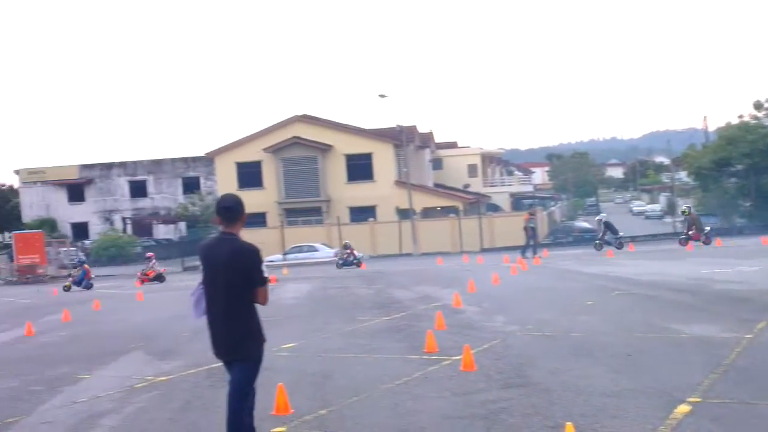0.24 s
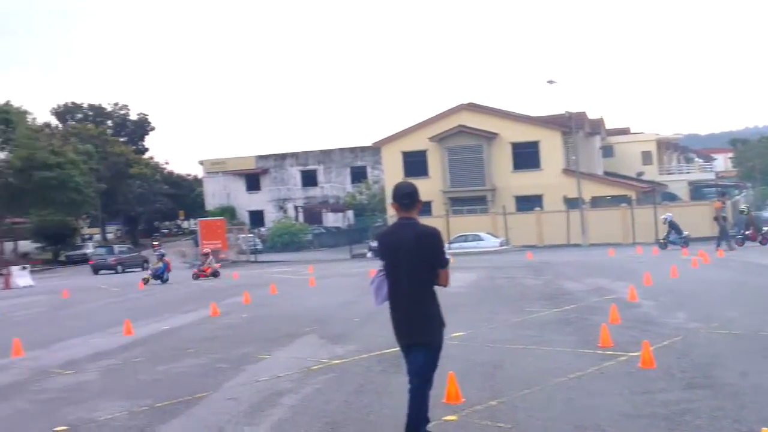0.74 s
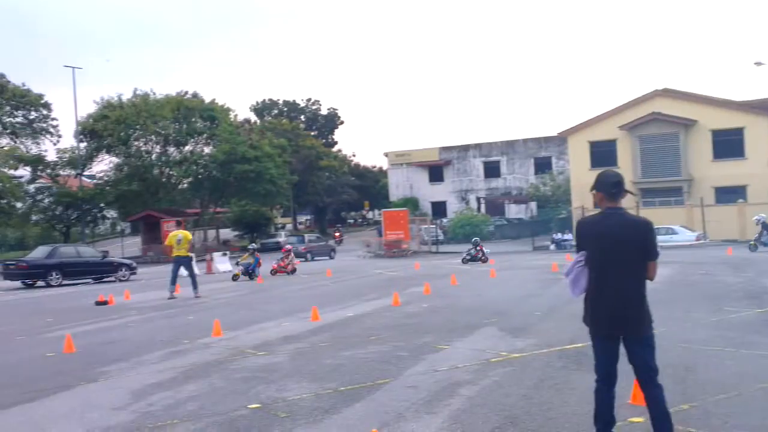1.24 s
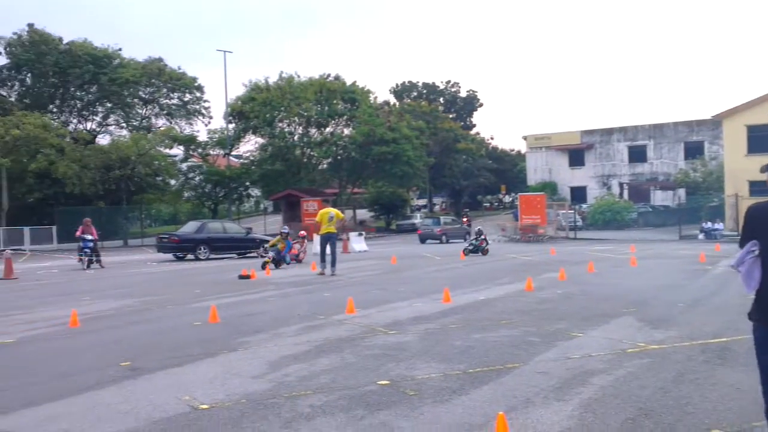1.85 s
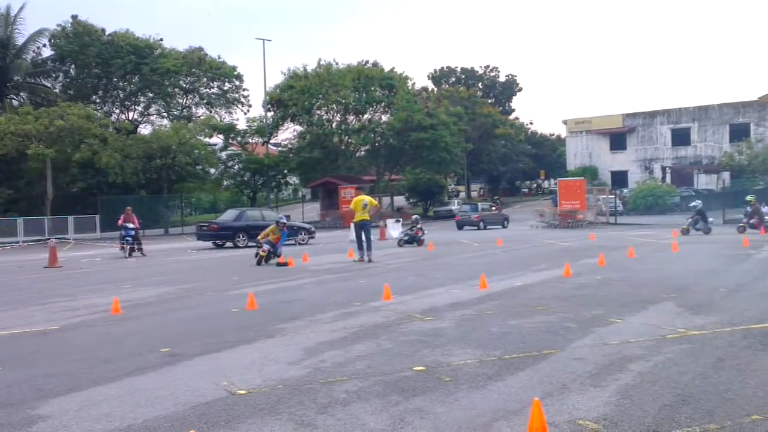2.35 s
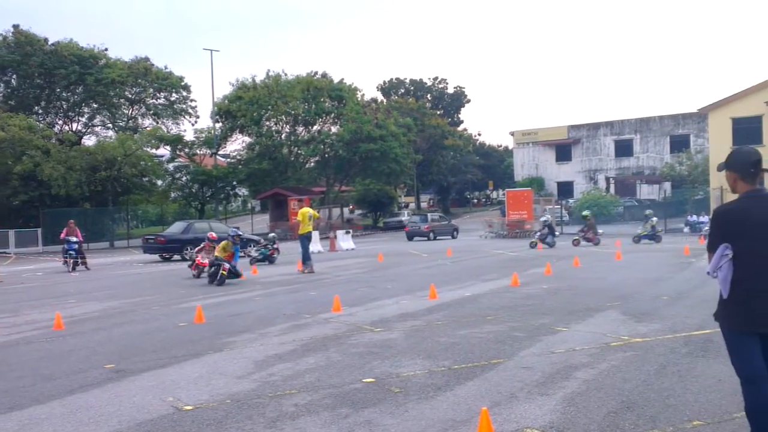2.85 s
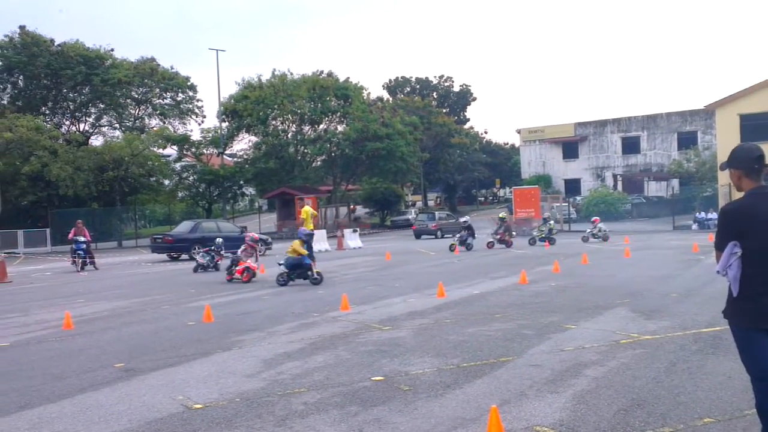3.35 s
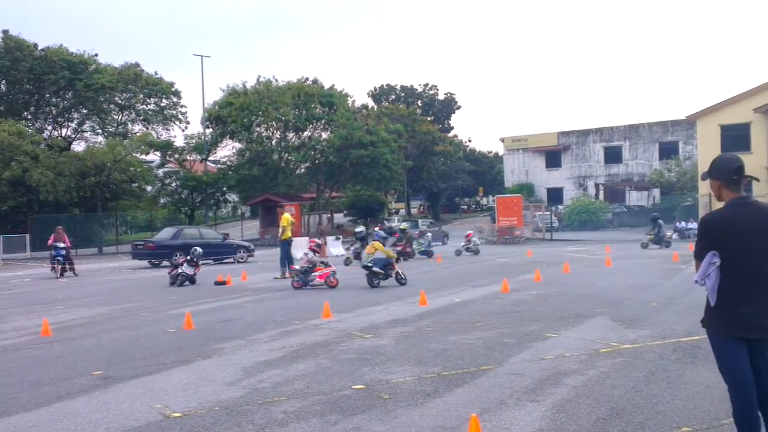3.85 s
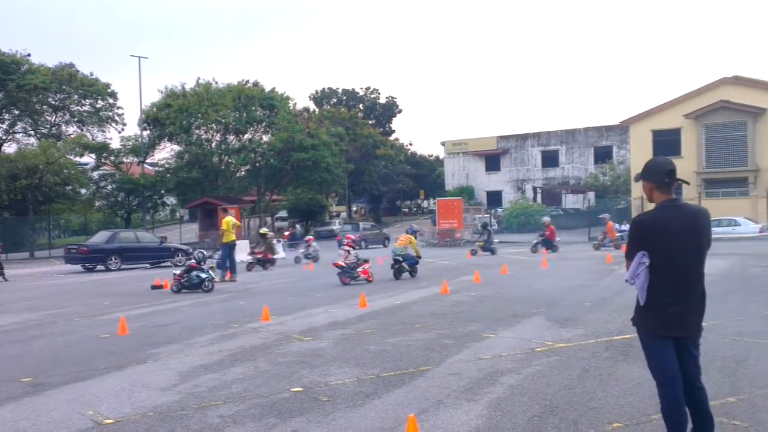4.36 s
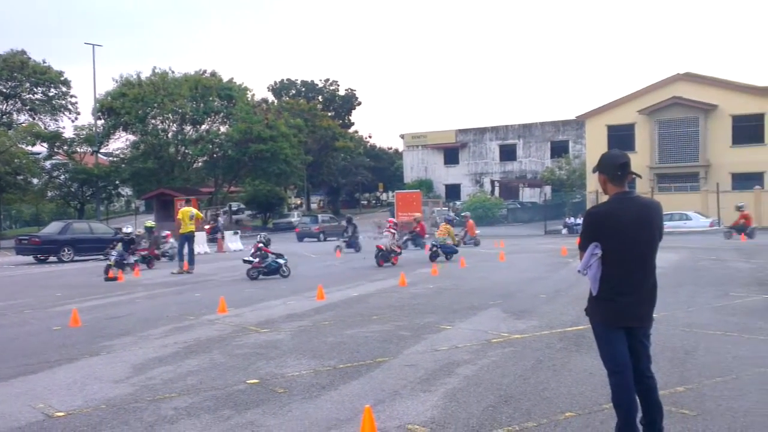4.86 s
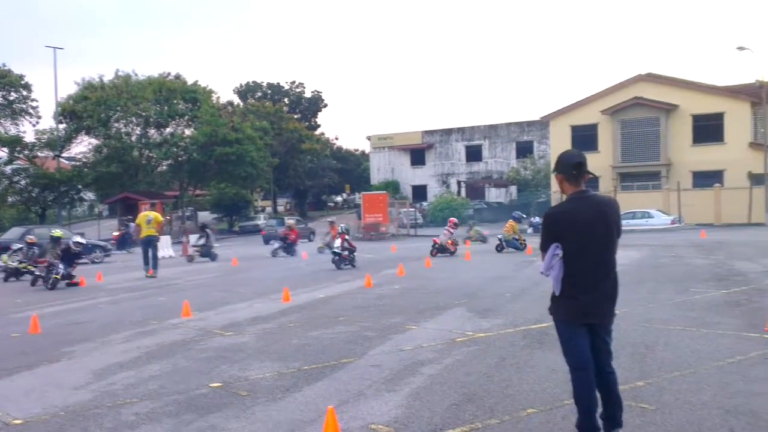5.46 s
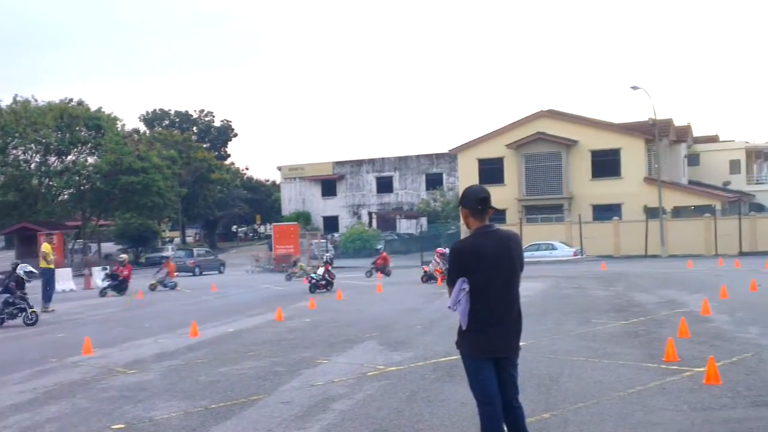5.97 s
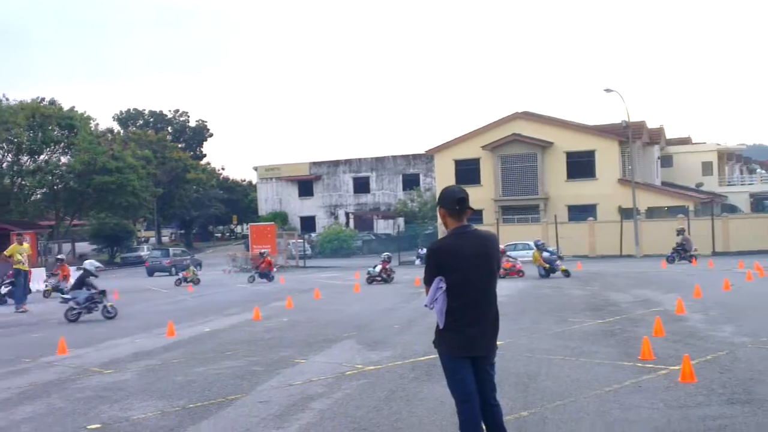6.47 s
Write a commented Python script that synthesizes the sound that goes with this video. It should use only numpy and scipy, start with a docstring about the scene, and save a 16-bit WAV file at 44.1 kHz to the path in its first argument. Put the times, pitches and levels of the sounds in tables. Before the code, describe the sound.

A trackside handheld stereo microphone catches minibikes circling a car park. A low raspy engine and a humming one come first, then steadier and higher ones overlap, fluttering in level. A bright full-throttle whine passes, fading into a thinner, quieter drone. Rapid exhaust pops snap, then a close pack blasts in abruptly, harsh and overloaded, one engine dropping in revs as another climbs. Faint building echoes.

```python
"""Two-stroke minibikes lap a paved yard between buildings, heard from the trackside: bikes stand out in turn,
crackling and popping, over a droning field; a bunch comes on loud near the end and clips.
Each engine is a train of exhaust cracks and gas noise that follows its revs, rung by its pipe and silencer.
Some add intake hum or swelling orders; pops are short bursts; walls echo, and two microphones colour the sum."""
import sys
import numpy as np
from scipy import signal
from scipy.fft import rfft, irfft, next_fast_len
from scipy.io import wavfile
from scipy.ndimage import uniform_filter1d, map_coordinates

SR = 44100
rng = np.random.default_rng(int(sys.argv[2]) if len(sys.argv) > 2 else 0)


def store_wav(level_fs):
    """Save 16-bit WAV to argv[1]."""
    pcm = np.round(np.clip(np.atleast_2d(level_fs), -1, 1) * 32767)
    wavfile.write(sys.argv[1], SR, pcm.T.astype(np.int16))


N = 295470
TIME = np.arange(N) / SR

# exhaust colour of the early and steady bikes: (frequency [Hz], gain [dB])
STEADY_PIPE = [(150, -45), (330, -21), (500, -16.5), (600, -13), (720, -9.5), (920, -7.5), (1450, -7),
               (2000, -8.5), (3300, -4.5), (5200, -12.5), (7500, -2), (10600, -10.5), (11600, -22),
               (15500, -35)]
# intake hum against order frequency, before hum_db; peaks at the air box resonance: (frequency [Hz], level [dB])
INTAKE = [(390, -28), (432, -18.5), (458, -19), (495, -18), (535, -11), (570, -25), (650, -17.5),
          (800, -22)]
# exhaust colour of the bunch, near and surging bikes and pops: (frequency [Hz], gain [dB])
BUNCH_PIPE = [(150, -48.5), (250, -26), (516, -18.5), (681, -2.5), (795, 0), (978, 2), (1120, -3.5),
              (1700, -12.5), (3700, -11), (4630, -11.5), (8320, -10), (9890, -10.5), (15500, -35)]
# silencer resonances of the bunch and near bike: (centre [Hz], half-width [Hz], peak [dB])
BUNCH_RINGS = [(830, 90, 1.5), (2700, 350, 3.8), (3750, 300, 3.5), (8500, 300, 4)]


def gain_of(db):
    """Decibels to amplitude."""
    return 10 ** (np.asarray(db) / 20)


def evened(x):
    """Scales to unit rms."""
    return x / np.sqrt(np.mean(x ** 2) + 1e-20)


def curve(rows):
    """Joins (time, value) points by straight lines."""
    return np.interp(TIME, *np.transpose(rows))


def read(points, hz):
    """Reads a spectrum table on a log-frequency axis."""
    f, value = np.transpose(points)
    return np.interp(np.log(hz + 1), np.log(f + 1), value)


def filtered(x, gain):
    """Applies a gain given as a function of frequency."""
    size = next_fast_len(N + 4096)
    return irfft(rfft(x, size) * gain(np.fft.rfftfreq(size, 1 / SR)), size)[..., :N]


def wander(per_s):
    """Smooth random curve of unit rms that changes about per_s times a second."""
    knots = rng.standard_normal(2048)
    coarse_s = TIME[::64]
    smooth = map_coordinates(knots, [coarse_s * per_s], order=3, mode="wrap")
    return evened(np.interp(TIME, coarse_s, smooth))


def running_rms(x, size=2400):
    """Level of both channels over a few firings."""
    power = uniform_filter1d(np.mean(x ** 2, axis=0), size)
    return np.sqrt(abs(uniform_filter1d(power, size)) + 1e-12)


def presence(rows):
    """Prominence of a source as a gain, fading over 50 ms outside its table."""
    to_edge_s = np.minimum(TIME - rows[0][0], rows[-1][0] - TIME)
    return gain_of(curve(rows)) * np.clip(to_edge_s / 0.05 + 1, 0, 1)


def silencer(cracks, rattle):
    """Chambers hold some bands back and rattle each crack, differently towards each microphone."""
    mean_delay_s, band_spacing_hz = 0.00036, 2314
    t, bins = np.arange(256) / SR, np.fft.rfftfreq(256, 1 / SR)
    delay_s = mean_delay_s * (1 + np.sin(2 * np.pi * bins / band_spacing_hz))
    # phase is the running sum of the group delay
    smear = irfft(np.exp(-2j * np.pi * np.cumsum(delay_s) * bins[1]))
    bounces = rattle * rng.standard_normal((2, len(t))) * np.exp(-t / 0.006)
    bounces = signal.lfilter(*signal.butter(2, 2000, "high", fs=SR), bounces)
    return signal.oaconvolve(cracks[None], smear + bounces, axes=1)[:, :N]


def turbulence(cracks, rasp_hz):
    """Gas noise follows each puff over a steady hiss, above the clean low engine orders."""
    puff_s, rise_s, hiss = 0.0052, 0.00069, 0.35
    puffs = signal.lfilter([1], [1, -np.exp(-1 / (puff_s * SR))], cracks)
    flow = evened(uniform_filter1d(puffs, int(rise_s * SR) + 1))
    noise = (flow + hiss) * rng.standard_normal((2, N))
    return signal.lfilter(*signal.butter(2, rasp_hz, "high", fs=SR), noise)


def firings(hz, rough, rasp_db, stutter=0, rattle=0.15, rasp_hz=1200):
    """Each firing cracks, uneven in time and strength by its roughness (0-1), inside turbulent gas."""
    jitter_s, spread_db = .00007, 11  # at roughness 1
    turns = np.cumsum(hz * (1 + .001 * wander(25))) / SR + rng.random()
    at = np.flatnonzero(np.diff(np.floor(turns)))
    late, strong = rng.standard_normal((2048, 2))[:len(at)].T
    place = at + (np.ceil(turns[at]) - turns[at]) * SR / hz[at] + late * rough * jitter_s * SR
    strength = gain_of(spread_db * rough * np.tanh(strong))
    # stutter weakens every second firing
    strength = strength * (1 - (stutter * np.ones(N))[at] * (np.arange(len(at)) % 2))
    # sinc pulses place the cracks between samples
    near = place.astype(int)[:, None] + np.arange(-6, 8)
    pulses = strength[:, None] * np.sinc(near - place[:, None])
    cracks = np.bincount(np.clip(near, 0, N - 1).ravel(), pulses.ravel(), N)
    return evened(silencer(cracks, rattle)) + gain_of(rasp_db) * turbulence(cracks, rasp_hz)


def exhaust(x, pipe, rings):
    """Causal (minimum-phase) ring of pipe and silencer: broad colour plus narrow resonances."""
    hz = abs(np.fft.fftfreq(4096, 1 / SR))
    db = read(pipe, hz) + sum(peak / (1 + ((hz - f) / width) ** 2) for f, width, peak in rings)
    log_gain = np.log(gain_of(np.maximum(db, -90)))
    ring = np.fft.ifft(np.exp(np.conj(signal.hilbert(log_gain)))).real
    return signal.oaconvolve(x, ring[None, :len(ring) // 2], axes=1)[:, :N]


def ground(x):
    """Late bounces off asphalt and nearby riders; their drifting combs make partials fade and swap."""
    def delayed(lag_s):
        return np.array([np.interp(TIME - lag_s, TIME, side) for side in x])
    asphalt = 0.062 * delayed(0.000317 * np.exp(.12 * wander(1.2)))
    riders = .38 * delayed(.0028 + .0003 * wander(2.5))
    return x + asphalt + riders


def partial(x, angle):
    """Narrow band of x around one gliding engine order, shifted to 0 Hz, smoothed and shifted back."""
    width_hz = 25
    turn, r = np.exp(1j * angle), np.exp(-np.pi * width_hz * 2 / SR)
    return 2 * (turn * signal.filtfilt([1 - r], [1, -r], x / turn)).real


def intake_hum(hz, angle, intake):
    """Clean engine orders 4-7, weighted by the air box resonance."""
    hum_db = -7.5
    order = np.arange(4, 8)[:, None]
    hum = np.sqrt(2) * np.sin(order * angle)
    return np.sum(gain_of(read(intake, order * hz) + hum_db) * hum, axis=0) * gain_of(wander(12))


def flutter():
    """Each source's level flutters fast and at random, as in turbulent air."""
    return gain_of(1.3 * wander(30))


def bike(revs, prominence, pipe, rings, level_db, rough, rasp_db, rattle=0.14, stutter=0, intake=None, whine=()):
    """One engine follows its revs through its exhaust, with any hum or whine; returns sound and share."""
    flywheel_s = 0.05  # rounds off changes of revs
    hz = uniform_filter1d(curve(revs), int(flywheel_s * SR))
    angle = 2 * np.pi * np.cumsum(hz) / SR
    sound = ground(exhaust(firings(hz, rough, rasp_db, stutter, rattle), pipe, rings))
    for order, boost in whine:
        sound = sound + (gain_of(curve(boost)) - 1) * partial(sound, order * angle)
    sound = evened(sound)
    if intake is not None:
        sound = sound + intake_hum(hz, angle, intake)
    share = gain_of(level_db) * presence(prominence)
    return sound * flutter() * share, share


def slow_bike():
    """Low revs with strong gas noise."""
    # revs: (time [s], firing rate [1/s])
    revs = [(0, 95.5), (0.8, 95), (1.45, 92), (2.75, 94.3), (3.05, 96.5), (3.3, 101), (3.55, 100)]
    # prominence before level_db: (time [s], level [dB])
    prominence = [(0, 3.5), (0.8, -5), (1.1, -4.5), (2.8, -8), (3.1, -9), (3.5, -9.5)]
    # exhaust colour: (frequency [Hz], gain [dB])
    pipe = [(88, -75), (150, -27), (462, -14), (519, -17.5), (796, -3), (966, 5), (2550, -19), (3410, -9),
            (4560, -13), (6230, -12.5), (8170, -55), (9730, -29.5), (15500, -56)]
    # silencer resonances: (centre [Hz], half-width [Hz], peak [dB])
    rings = [(873, 59, 4)]
    return bike(revs, prominence, pipe, rings, level_db=1.0, rough=0.52, rasp_db=9.5)


def early_bike():
    """Fairly even firing with intake hum."""
    # revs: (time [s], firing rate [1/s])
    revs = [(0, 99.5), (0.15, 101.5), (0.4, 102), (0.5, 107.2), (0.87, 110.2), (1.07, 108.6), (1.25, 98)]
    # prominence before level_db: (time [s], level [dB])
    prominence = [(0, 1.5), (0.5, -2), (1.05, 0.5), (1.25, -21)]
    # silencer resonances: (centre [Hz], half-width [Hz], peak [dB])
    rings = [(1040, 47, 1), (3580, 120, 4), (4600, 290, 3), (6460, 420, 8), (7800, 630, -7),
             (9750, 1300, 8)]
    return bike(revs, prominence, STEADY_PIPE, rings, level_db=-3.0, rough=0.38, rasp_db=-4, intake=INTAKE)


def steady_bike():
    """The early bike's pipe and hum, with other resonances and revs."""
    # revs: (time [s], firing rate [1/s])
    revs = [(1.38, 92.5), (1.62, 104), (1.76, 105), (1.93, 110.5), (2.15, 112.7), (2.5, 114.7),
            (2.85, 115.2), (3.5, 112.8)]
    # prominence before level_db: (time [s], level [dB])
    prominence = [(1.42, -15), (1.7, -5), (2.4, 1), (3.1, -4.5), (3.56, -6.5)]
    # silencer resonances: (centre [Hz], half-width [Hz], peak [dB])
    rings = [(3670, 250, 3)]
    return bike(revs, prominence, STEADY_PIPE, rings, level_db=2.5, rough=0.38, rasp_db=-4, intake=INTAKE)


def chaser():
    """High revs, little gas noise; one order swells and fades as it rounds the bend."""
    # revs: (time [s], firing rate [1/s])
    revs = [(0.6, 125), (0.72, 132), (0.9, 134.6), (0.98, 129.3), (1.35, 128.2), (1.65, 122.5), (1.95, 124),
            (2.08, 131.5), (2.25, 129.3), (2.55, 129.4), (2.67, 130.6), (2.8, 125), (2.95, 123.5)]
    # prominence before level_db: (time [s], level [dB])
    prominence = [(0.6, -6), (0.75, -4), (1.4, -5.5), (1.7, -7), (1.95, -4.5), (2.2, -6), (2.35, 1.5),
                  (2.65, 3), (2.8, -3.5), (2.96, -8)]
    # exhaust colour: (frequency [Hz], gain [dB])
    pipe = [(150, -44), (450, -24), (650, -6), (830, -3.5), (1250, 1.5), (2100, -9.5), (3400, -6),
            (5100, -3.5), (6500, -4), (10600, -3), (11600, -21.5), (15500, -28)]
    # silencer resonances: (centre [Hz], half-width [Hz], peak [dB])
    rings = [(1431, 110, 6), (1685, 45, 9), (1940, 45, 3), (2345, 40, 9)]
    # swelling order: (engine order, [(time [s], boost [dB])])
    whine = [(11, [(1.0, 0), (1.4, 4), (1.9, 0), (2.1, 5), (2.35, 10), (2.65, 9), (2.8, 2)])]
    return bike(revs, prominence, pipe, rings, level_db=1.2, rough=0.42, rasp_db=-9.0, rattle=0.07, whine=whine)


def leader():
    """Full throttle fires evenly; three orders swell and fade as it rounds the bend."""
    # revs: (time [s], firing rate [1/s])
    revs = [(3.48, 116), (3.56, 122.6), (3.62, 131), (3.69, 135.9), (3.8, 137.6), (3.92, 140.1),
            (4.0, 140.7), (4.12, 138), (4.21, 138.5), (4.3, 134.8), (4.36, 131), (4.42, 120)]
    # prominence before level_db: (time [s], level [dB])
    prominence = [(3.48, -2.5), (3.6, 3.5), (3.7, -2), (4.2, 7), (4.34, 0), (4.42, -16)]
    # exhaust colour: (frequency [Hz], gain [dB])
    pipe = [(150, -50), (550, -21), (700, -4.5), (1100, 0), (1500, -3.5), (2000, -15), (2500, -7),
            (3200, -35), (3900, -6.5), (5100, -9.5), (6200, -14), (7500, -14.5), (10300, -18.5),
            (15500, -39)]
    # silencer resonances: (centre [Hz], half-width [Hz], peak [dB])
    rings = [(825, 40, -2), (1100, 45, -3), (1255, 50, 5), (1810, 50, 11), (2380, 55, 9), (2650, 45, 10),
             (3910, 100, 11), (4620, 90, 7), (5020, 90, 8), (5750, 120, 6)]
    # swelling orders: (engine order, [(time [s], boost [dB])])
    whine = [(8, [(3.58, 0), (3.67, 13), (3.8, 14), (3.9, -3), (4.18, 0), (4.3, 13)]), (9, [(3.55, 5),
             (3.8, 1), (3.88, 12), (4.1, 11), (4.3, 8)]), (6, [(3.6, 2), (3.75, -2), (3.97, -4), (4.07, 7),
             (4.32, 5)])]
    return bike(revs, prominence, pipe, rings, level_db=-3.5, rough=0.15, rasp_db=-14, rattle=0.045, whine=whine)


def coaster():
    """Low, nearly constant revs with little rattle."""
    # revs: (time [s], firing rate [1/s])
    revs = [(4.1, 95), (4.22, 97.7), (4.5, 96.8), (4.72, 95.8)]
    # prominence before level_db: (time [s], level [dB])
    prominence = [(4.1, -10), (4.25, -2), (4.4, -6), (4.68, 2.5), (4.78, -27)]
    # exhaust colour: (frequency [Hz], gain [dB])
    pipe = [(150, -44), (480, -16), (750, 7), (1450, 7), (1800, 0), (3900, 0.5), (5200, -1), (7500, 1),
            (10500, -8.5), (15500, -29)]
    # silencer resonances: (centre [Hz], half-width [Hz], peak [dB])
    rings = [(666, 29, 6), (760, 70, 1), (1470, 36, 3), (3950, 330, 9.5), (5000, 600, 4)]
    return bike(revs, prominence, pipe, rings, level_db=-2.0, rough=0.24, rasp_db=-9, rattle=0.055)


def late_bike():
    """Off the throttle every second firing is weak, less so as the revs pick up."""
    # revs: (time [s], firing rate [1/s])
    revs = [(4.7, 93), (4.83, 97.3), (4.89, 101.7), (5.0, 105.1), (5.17, 107.3), (5.4, 106.6),
            (5.46, 101.5), (5.85, 99.5)]
    # prominence before level_db: (time [s], level [dB])
    prominence = [(4.65, -1), (4.8, -6.5), (4.95, -2), (5.38, -4), (5.46, -15.5), (5.85, -8)]
    # exhaust colour: (frequency [Hz], gain [dB])
    pipe = [(100, -66), (200, -32), (500, -22), (650, -1.5), (900, 2), (1500, -1.5), (1800, 1.5),
            (2600, -4.5), (4000, -4.5), (5800, -15), (7700, -2.5), (10500, -16), (15500, -30)]
    # silencer resonances: (centre [Hz], half-width [Hz], peak [dB])
    rings = [(855, 16, 8), (950, 25, 9.5), (1380, 66, 8), (1584, 26, 8), (1770, 110, -19)]
    # loss of every second firing: (time [s], depth [0-1])
    stutter = [(4.82, 0.9), (4.88, 0.37)]
    return bike(revs, prominence, pipe, rings, level_db=-1.4, rough=0.24, rasp_db=-5.0, rattle=0.045,
                stutter=curve(stutter))


def near_bike():
    """Rough firing whose revs rise, then drop sharply."""
    # revs: (time [s], firing rate [1/s])
    revs = [(5.42, 100.9), (5.85, 102.3), (6.15, 112.3), (6.25, 79.76), (6.4, 69.42), (6.7, 73.66)]
    # prominence before level_db: (time [s], level [dB])
    prominence = [(5.46, -8), (5.62, -7.5), (6.1, -3), (6.27, 5), (6.42, -1), (6.55, 1), (6.7, -8)]
    return bike(revs, prominence, BUNCH_PIPE, BUNCH_RINGS, level_db=2.0, rough=0.6, rasp_db=-5.0)


def surging_bike():
    """Rough firing with climbing revs."""
    # revs: (time [s], firing rate [1/s])
    revs = [(5.6, 111.7), (5.85, 117.8), (6.0, 121), (6.12, 126), (6.3, 127.6), (6.5, 129.7), (6.7, 134.1)]
    # prominence before level_db: (time [s], level [dB])
    prominence = [(5.6, -13), (5.95, -7), (6.1, -1.5), (6.25, -1), (6.4, 1), (6.7, -8)]
    # silencer resonances: (centre [Hz], half-width [Hz], peak [dB])
    rings = [(910, 67, 5.3), (1232, 27, 13), (1433, 125, 18.3)]
    return bike(revs, prominence, BUNCH_PIPE, rings, level_db=-2.5, rough=0.69, rasp_db=-4.5)


def pops():
    """Unburnt fuel catches in the pipe, at even gaps within a run: each a hard crack and short roar."""
    # runs of pops: (first [s], last [s], count, level [dB], ring [Hz])
    runs = [(.378, .378, 1, -2, 6500), (.478, .478, 1, 0, 6800), (.568, .568, 1, 4, 6200),
            (2.315, 2.315, 1, -1, 7500), (2.37, 2.377, 2, 0, 2000), (2.47, 2.47, 1, -2, 6200),
            (3.057, 3.057, 1, 3, 2000), (4.527, 4.527, 1, -2, 4500), (4.571, 4.571, 1, 2.5, 6460),
            (4.614, 4.614, 1, 1, 4000), (4.725, 4.768, 3, 1, 7600), (4.79, 4.832, 2, 5, 7800),
            (4.912, 4.912, 1, 9.5, 7600), (5.441, 5.441, 1, 0, 3700), (6.188, 6.188, 1, 6, 1000),
            (6.274, 6.274, 1, 10, 1000), (6.299, 6.323, 2, 7, 1000), (6.368, 6.395, 2, 12.5, 5460),
            (6.424, 6.424, 1, 5, 5440), (6.536, 6.565, 3, 4, 2500)]
    width_hz, ring_db, decay_s, crack = 540, 11.5, 0.0011, 2.5
    t, out = np.arange(1024) / SR, np.zeros((2, N))
    for first, last, count, db, ring_hz in runs:
        for s in np.linspace(first, last, max(round(count), 1)):
            burst = rng.standard_normal((2, len(t))) * np.exp(-t / decay_s)
            burst[:, 0] = crack
            pop = exhaust(burst + 0.31 * burst[::-1], BUNCH_PIPE, [(ring_hz, width_hz, ring_db)])
            out[:, round(s * SR):][:, :pop.shape[1]] += gain_of(db) * pop
    return out


def group(prominence, pipe, rings, rates_hz, swing, rough, rasp_db, echo_db):
    """Engines whose revs drift apart, blurred by the walls; returns sound and share."""
    drive = np.zeros((2, N))
    for hz in rates_hz:
        engine = firings(hz * np.exp(swing * wander(1.6)), rough, rasp_db, rasp_hz=238)
        drive += engine * gain_of(2 * wander(5.3))
    share = presence(prominence)
    return evened(yard(exhaust(drive, pipe, rings), echo_db, t60=1.0)) * share * flutter(), share


def bunch():
    """Two rough engines in the bunch that comes out of the bend."""
    # prominence: (time [s], level [dB])
    prominence = [(5.38, 3), (5.47, -3.5), (6.15, 2), (6.34, -2), (6.5, -0.5), (6.7, -11)]
    return group(prominence, BUNCH_PIPE, BUNCH_RINGS, np.linspace(86.6, 120.2, 2), swing=.05,
                 rough=0.66, rasp_db=-4.0, echo_db=-1)


def far_field():
    """Three distant engines drone throughout."""
    # prominence: (time [s], level [dB])
    prominence = [(0, -5), (1.35, -5), (2.0, -3), (2.6, -1.5), (3.5, -6), (3.68, -5), (4.0, -4.5),
                  (4.8, -5), (5.2, -7.5), (6.7, -3.5)]
    # exhaust colour: (frequency [Hz], gain [dB])
    pipe = [(150, -51), (300, -21.5), (520, -13), (720, 2.5), (1000, 1), (1400, -2.5), (2000, -6.5),
            (3400, -2), (5200, -10), (7100, -8), (10000, -18), (11500, -20), (15500, -47)]
    return group(prominence, pipe, [], np.linspace(91.43, 125.48, 3), swing=.06,
                 rough=0.55, rasp_db=-6.5, echo_db=-3)


def yard(x, echo_db, t60):
    """Scattered echoes from walls, cars and trees."""
    delay_s = rng.uniform(.004, .45, (2, 260))
    strength = rng.standard_normal(delay_s.shape) * gain_of(-60 * delay_s / t60)
    taps = np.zeros((2, SR // 2))
    np.put_along_axis(taps, (delay_s * SR).astype(int), strength, 1)
    taps /= np.linalg.norm(taps, axis=1, keepdims=True)
    return x + gain_of(echo_db) * signal.fftconvolve(x, taps, axes=1)[:, :N]


def ports(x):
    """Two close microphones hear low notes alike; each port adds its own colour and delay."""
    # gain on the microphones' difference: (frequency [Hz], gain [dB])
    width = [(200, -32), (600, -12), (1200, -1.5), (3000, -6), (10000, 2.5)]
    # left over right level: (frequency [Hz], level [dB])
    tilt = [(60, 9), (120, -4), (240, -8), (480, 4.5), (950, -1.5), (1890, 2), (3770, -6), (7520, -7.5),
            (15000, 8)]
    # left lead over right: (frequency [Hz], phase [rad])
    phase = [(500, -0.76), (1200, 0.84), (3000, -1.44), (5500, 1), (9000, -1.63), (14000, 1)]
    mid = (x[0] + x[1]) / 2
    side = filtered((x[0] - x[1]) / 2, lambda hz: gain_of(read(width, hz)))
    half = np.array([[.5], [-.5]])
    return filtered(np.array([mid + side, mid - side]),
                    lambda hz: gain_of(half * read(tilt, hz)) * np.exp(1j * half * read(phase, hz)))


def turned(field):
    """Pipes turn to and from the listener: treble and body are levelled and remixed."""
    # treble relative to the whole: (time [s], level [dB])
    facing = [(0, -2), (1.3, -2.5), (2.3, -5), (2.7, -3.5), (3.2, -3), (3.6, -5), (4.1, -4.5), (4.8, -3.5),
              (5.2, -3.5), (5.5, -7), (5.85, -6), (6.1, -7), (6.4, -5.5), (6.7, -5)]
    treble = filtered(field, lambda hz: 1 / (1 + (4700 / (hz + 1)) ** 6))
    body = field - treble
    treble_share = np.clip(gain_of(curve(facing)), 0, .9)
    body_share = np.sqrt(1 - treble_share ** 2)
    return treble_share * treble / running_rms(treble) + body_share * body / running_rms(body)


def scene():
    """Bikes and groups share one overall level and bearing; pops are added on top."""
    # all engines together, before level_trim_db: (time [s], level [dB])
    loudness = [(0.04, -21), (0.55, -17), (0.66, -18.5), (0.7, -22), (0.76, -18), (1.11, -18),
                (1.22, -22.5), (1.35, -26), (1.46, -19.5), (1.62, -21), (1.69, -15), (1.85, -18.5),
                (2.22, -13.5), (2.27, -19.5), (2.38, -17), (2.72, -21.5), (2.82, -16), (2.95, -16.5),
                (3.02, -20), (3.08, -15), (3.28, -17.5), (3.37, -15), (3.575, -12.5), (3.61, -27),
                (3.67, -18.5), (3.78, -21.5), (3.84, -28), (3.94, -20), (4.0, -27.5), (4.06, -24.5),
                (4.21, -25.5), (4.28, -19), (4.41, -24.5), (4.6, -23), (4.72, -21), (4.9, -14.5),
                (5.04, -21.5), (5.16, -17.5), (5.22, -24), (5.33, -20), (5.37, -25), (5.425, -24.5),
                (5.465, -8), (5.6, -10), (5.98, -10.5), (6.1, -9.5), (6.2, -11), (6.32, -12), (6.345, -17),
                (6.38, -10), (6.41, -16.5), (6.47, -12.5), (6.54, -12), (6.6, -15), (6.66, -13.5)]
    # left over right, before bearing_trim_db: (time [s], level [dB])
    bearing = [(0.0, 3.5), (1.83, 2), (2.46, 4.5), (3.08, -1), (3.4, 2), (3.84, -6.5), (4.05, 3),
               (4.55, -9.5), (4.89, -2.5), (6.7, -3)]
    level_trim_db, bearing_trim_db = 1.29, 4.54
    flutter_db, flutter_per_s = 1.0, 17  # overall level flutters at random
    sources = [slow_bike(), early_bike(), steady_bike(), chaser(), leader(), coaster(), late_bike(),
               near_bike(), surging_bike(), bunch(), far_field()]
    total_share = np.sqrt(sum(share ** 2 for sound, share in sources))
    field = sum(sound for sound, share in sources) / total_share
    field = turned(ports(yard(field, echo_db=-11, t60=.4)))
    level_db = curve(loudness) + level_trim_db + flutter_db * wander(flutter_per_s)
    pan_db = np.outer([.5, -.5], curve(bearing) + bearing_trim_db)
    return field * gain_of(level_db + pan_db) + pops()


def record(dry):
    """Overloaded microphones clip the loudest cracks; then a low-pass limits the band."""
    ceiling, edge_hz = 0.93, 15750
    clipped = np.clip(dry, -ceiling, ceiling)
    return signal.oaconvolve(clipped, signal.firwin(511, edge_hz, window=("kaiser", 9), fs=SR)[None], "same")


dry = scene()
out = record(dry)
store_wav(out)
```